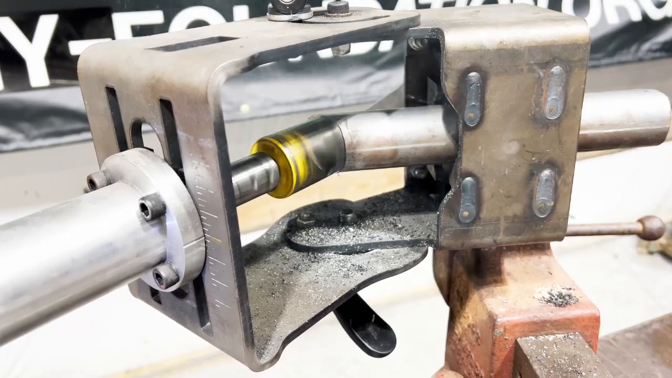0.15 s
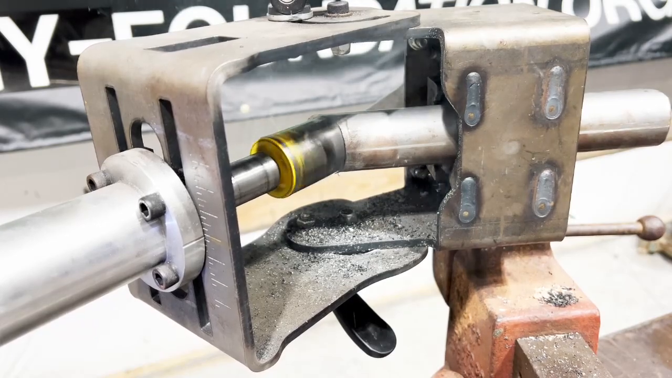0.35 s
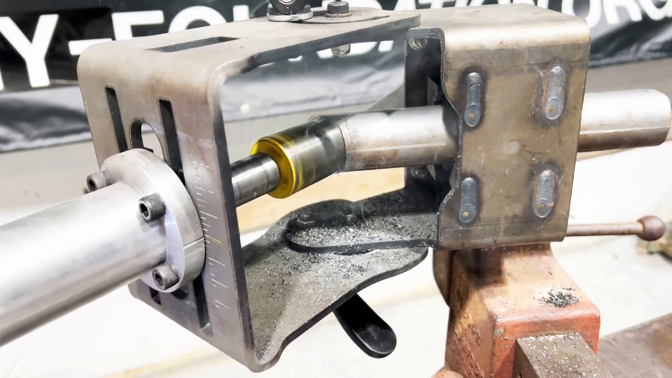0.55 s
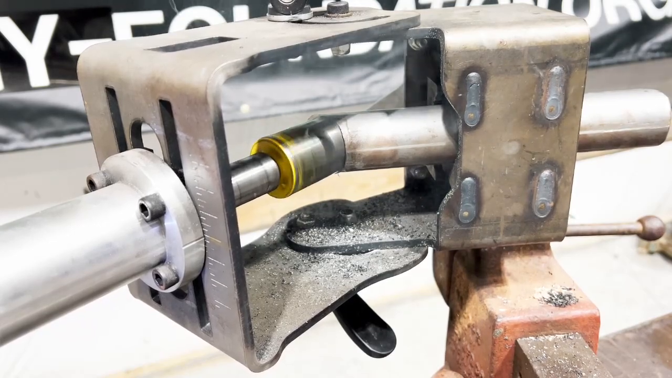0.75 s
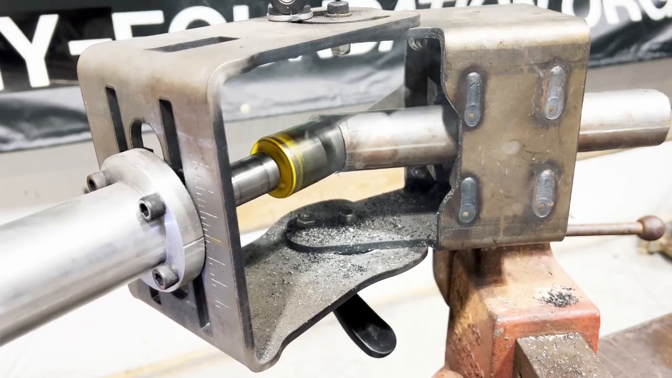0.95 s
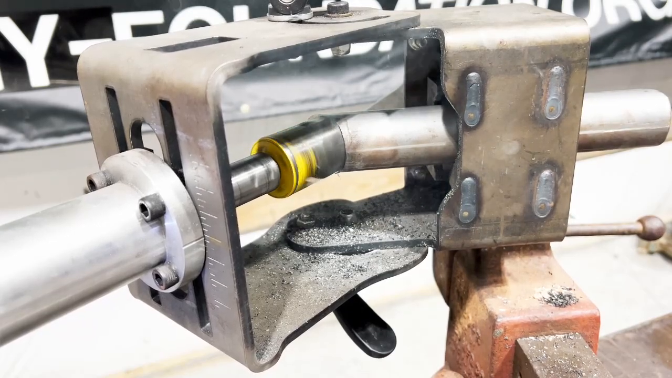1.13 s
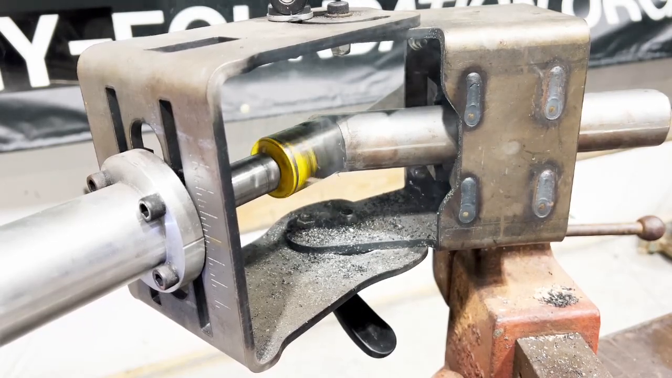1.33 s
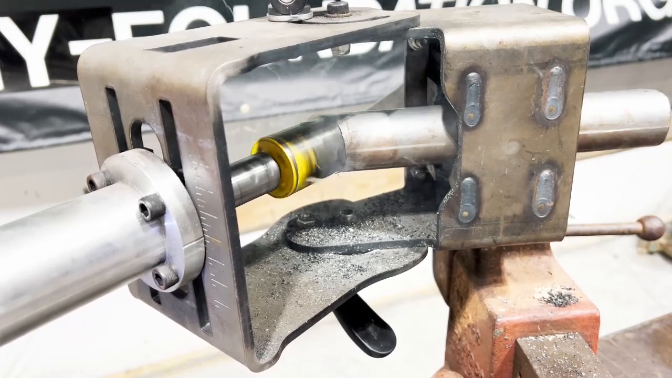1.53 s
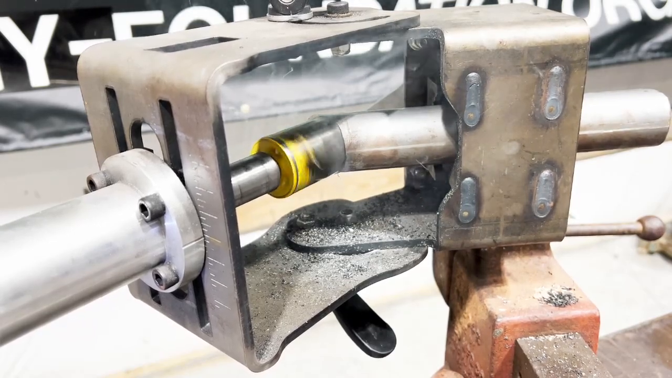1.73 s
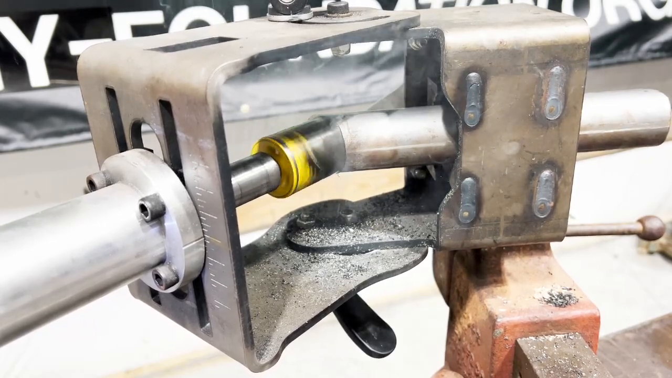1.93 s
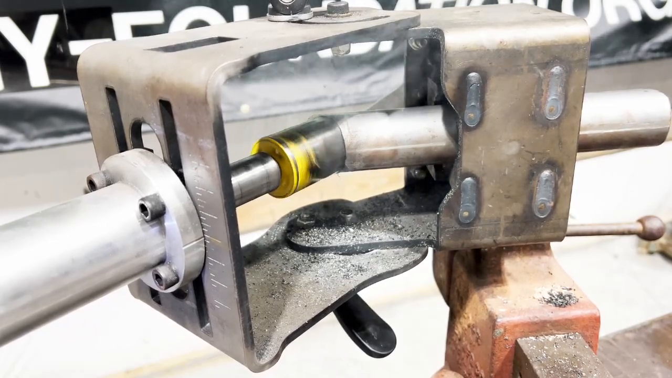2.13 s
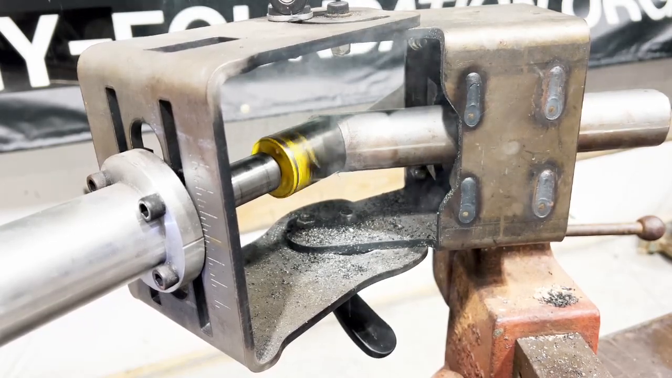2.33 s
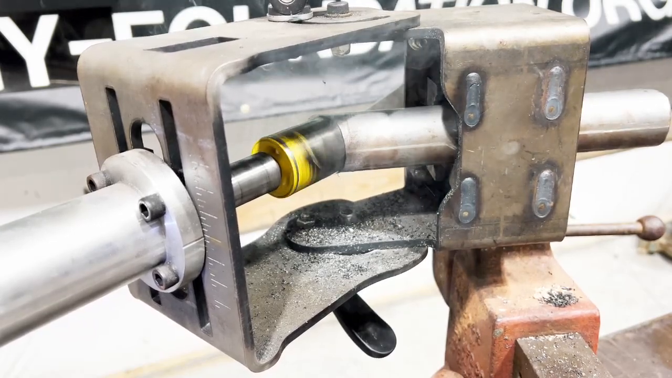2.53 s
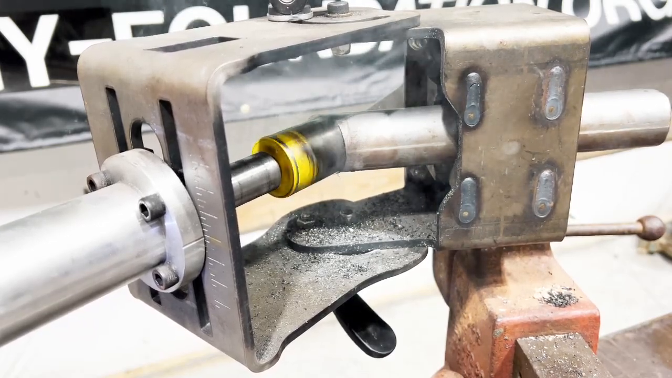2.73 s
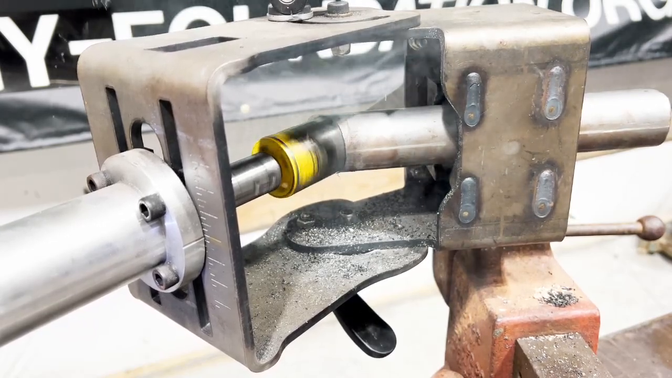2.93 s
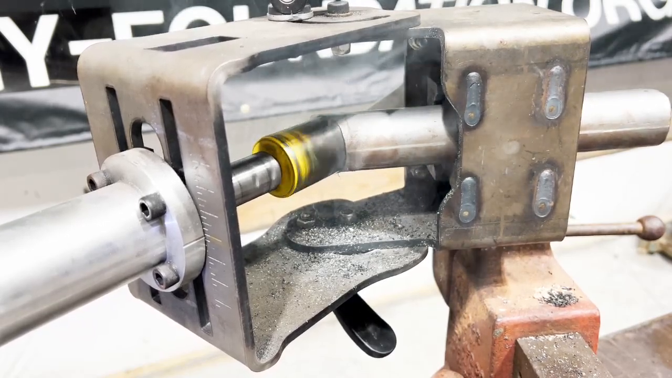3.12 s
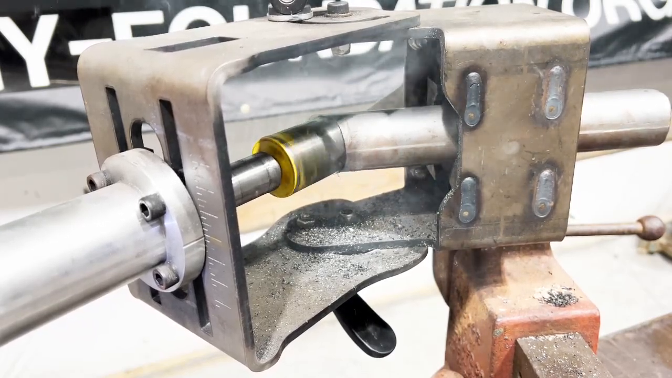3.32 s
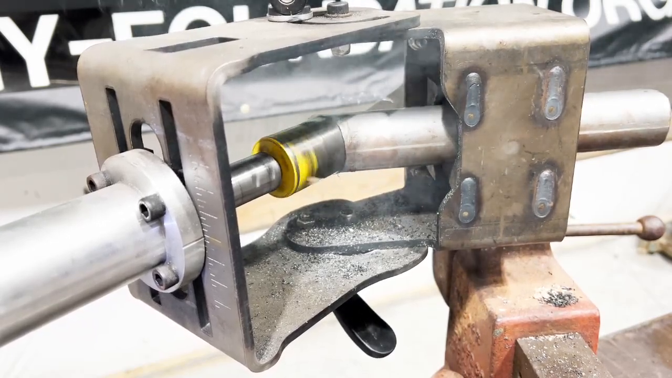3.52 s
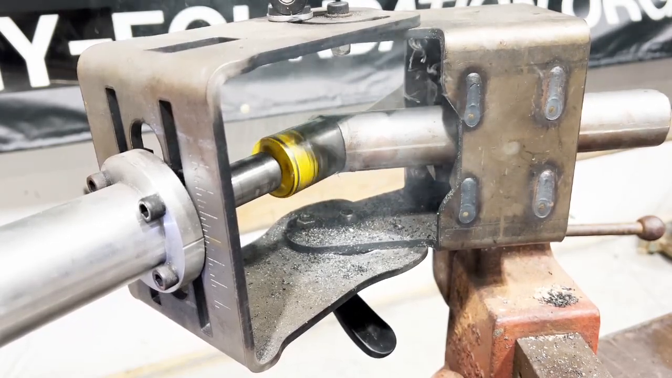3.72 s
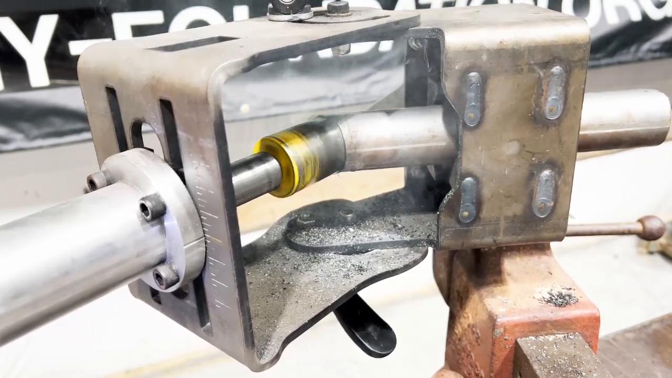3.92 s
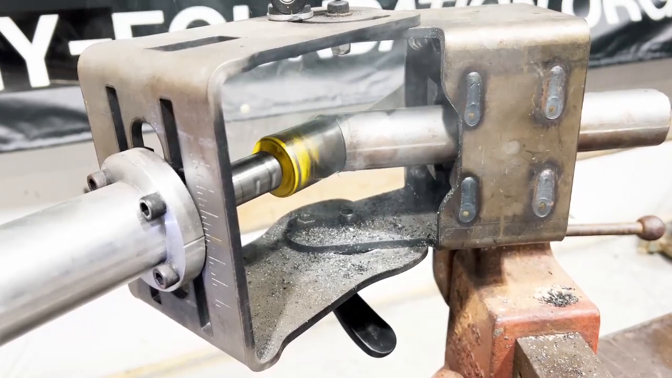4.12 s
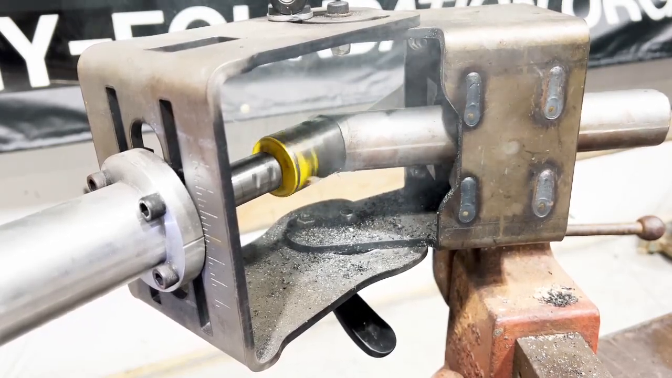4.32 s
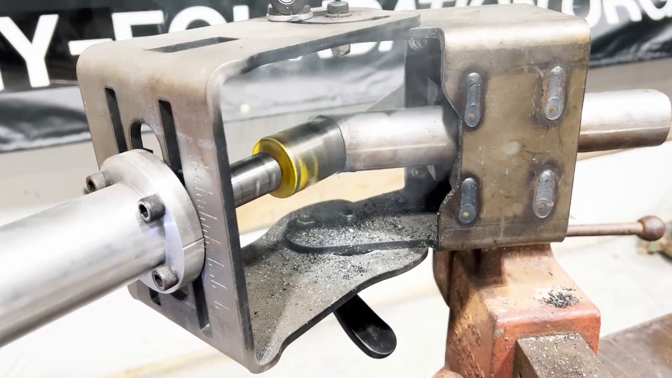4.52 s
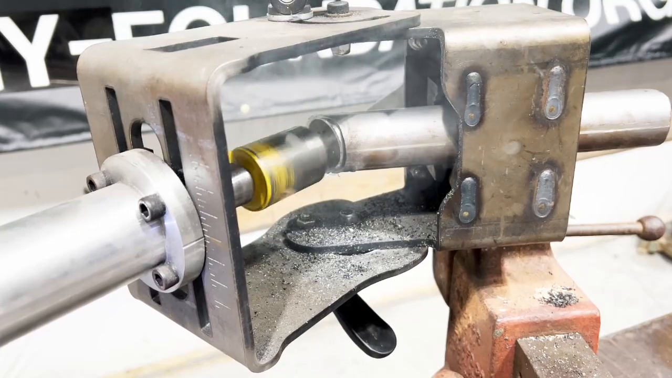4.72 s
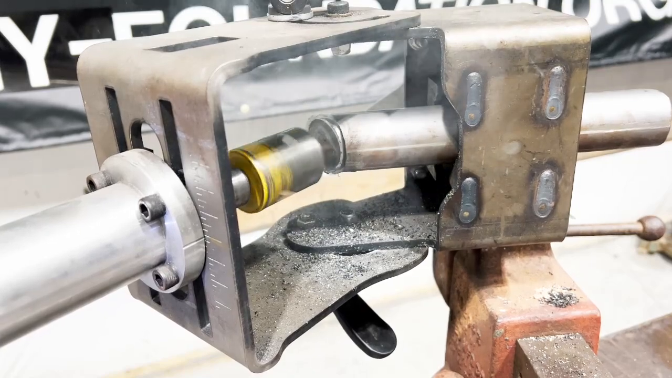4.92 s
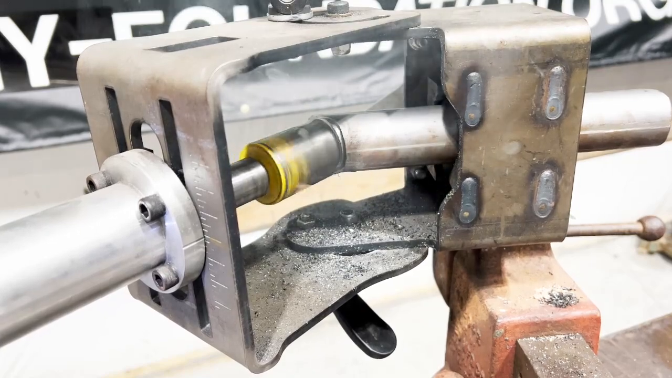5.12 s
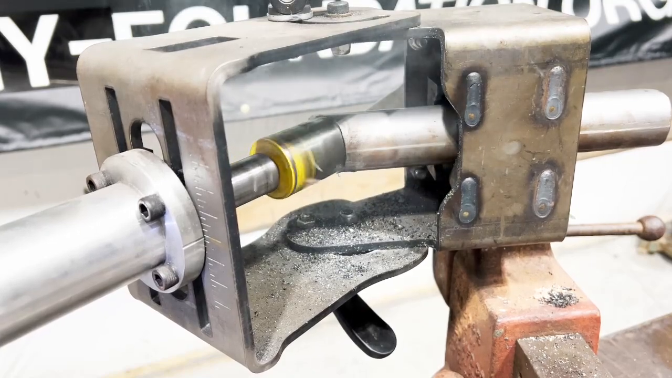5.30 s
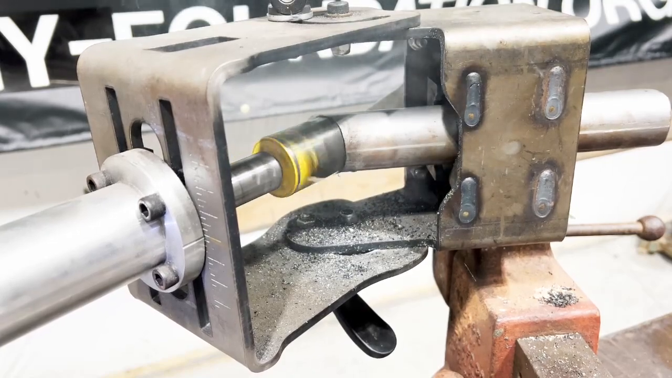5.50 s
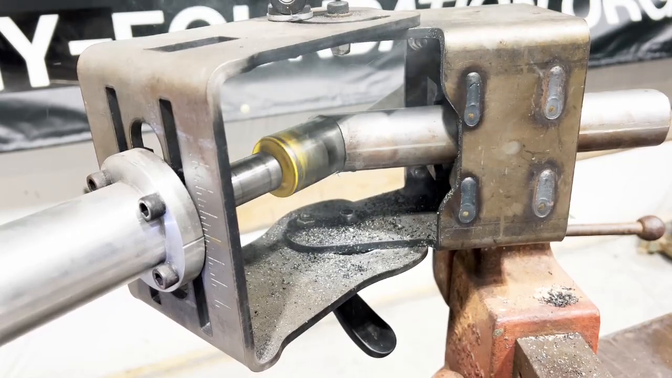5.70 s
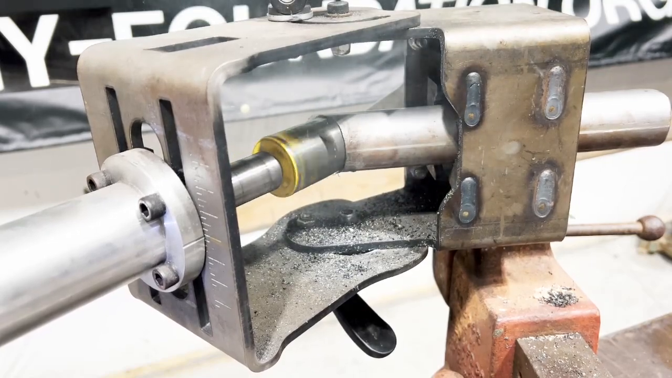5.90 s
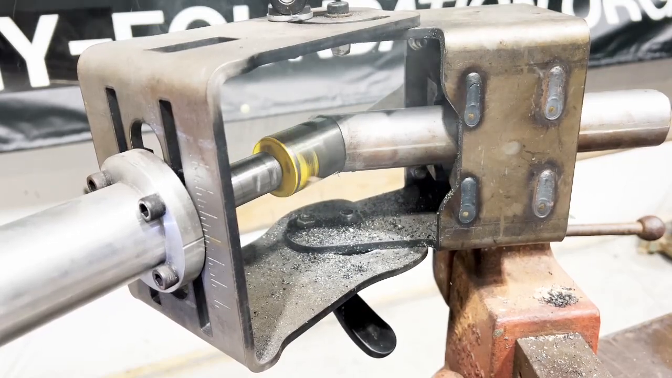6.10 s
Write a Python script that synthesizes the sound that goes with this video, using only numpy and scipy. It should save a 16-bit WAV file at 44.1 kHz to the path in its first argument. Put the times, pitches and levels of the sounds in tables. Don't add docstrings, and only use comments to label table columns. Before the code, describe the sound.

A drill-driven hole saw grinds through a steel tube with rapid rhythmic screeching chatter, backs off to a bare whirr, then bites in again louder.

```python
import sys
import numpy as np
from scipy import signal
from scipy.fft import rfft, irfft, next_fast_len
from scipy.io import wavfile

SR = 44100
rng = np.random.default_rng(int(sys.argv[2]) if len(sys.argv) > 2 else 0)


def store_wav(level_fs):
    pcm = np.round(np.clip(np.atleast_2d(level_fs), -1, 1) * 32767)
    wavfile.write(sys.argv[1], SR, pcm.T.astype(np.int16))


def boost(x):
    u = np.asarray(x, float) / 20
    return 10 ** u


N = 271215

# (frequency [Hz], width [Hz], level [dB])
PLATE_MODES = [(1162, 16, 3), (1522, 13, 11.5), (2350, 250, 2.5), (3380, 910, -0.5)]


def rms_one(x):
    return x / np.sqrt(np.mean(x ** 2) + 1e-20)


def at_hz(points, hz):
    point_hz, db = np.transpose(points)
    return np.interp(np.log(hz + 1), np.log(point_hz), db)


def drift(rate):
    r = np.exp(-2 * np.pi * rate / SR)
    noise = rng.standard_normal(N + 20000)
    return rms_one(signal.lfilter([1], [1, -2 * r, r * r], noise)[20000:])


def filtered(x, order, hz, kind):
    return signal.sosfilt(signal.butter(order, hz, kind, fs=SR, output="sos"), x)


def delayed(x, lag_s):
    return np.interp(np.arange(N) - lag_s * SR, np.arange(N), x)


def modes(x, table, sway_db=0.0):
    out = 0
    sway = boost(sway_db * np.clip(drift(26.8), -3, 1.6))
    for k, (hz, width, db) in enumerate(table):
        r = np.exp(-np.pi * width / SR)
        top = (1 - r * r) / 2 * boost(db) * (-1) ** k
        poles = [1, -2 * r * np.cos(2 * np.pi * hz / SR), r * r]
        drive = x * np.roll(sway, 9973 * k)
        out = out + signal.lfilter([top, 0, -top], poles, drive)
    return out


def coloured(x, spectrum):
    gain = boost(at_hz(spectrum, np.fft.rfftfreq(N, 1 / SR)))
    return rms_one(irfft(rfft(x) * gain, N))


def grains(spread_db):
    return rng.standard_normal(N) * boost(spread_db * np.minimum(rng.exponential(1, N), 4))


def two_sides(x, alike):
    return np.array([x, alike * x + np.sqrt(1 - alike ** 2) * np.roll(x, N // 3)])


def frame(rumble_db, hum_db):
    # (frequency [Hz], width [Hz], level [dB])
    bench_modes = [(212.2, 31.6, -3), (253, 27, 1.5), (323, 134, -3.5)]
    # (frequency [Hz], width [Hz], level [dB])
    bearing_modes = [(96, 44, 2), (122, 54, 1.5)]
    # (time [s], frequency [Hz], width [Hz], level [dB])
    tube_settles = (5.632, 220, 25, -34)

    def shaken(body):
        noise = two_sides(rng.standard_normal(N), alike=0.85)
        return rms_one(modes(modes(noise, body, sway_db=3.5), body))

    rumble = shaken(bench_modes)
    hum = shaken(bearing_modes)
    s, hz, width, db = tube_settles
    click = (np.arange(N) == round(s * SR)) + 1e-18
    thud = modes(click, [(hz, width, db + 46.0)])
    return boost(rumble_db) * rumble + boost(hum_db) * hum + thud


def free_spin(t):
    # (frequency [Hz], width [Hz], level [dB])
    spin_moan = [(361, 57, 0.0)]
    middle_s, width_s, level_db = 5.14, 0.15, -62
    spinning = np.exp(-((t - middle_s) / width_s) ** 4)
    moan = modes(modes(rng.standard_normal(N), spin_moan), spin_moan)
    return boost(level_db) * spinning * rms_one(moan)


def drill(grind_db):
    # (frequency [Hz], level per Hz [dB])
    fan_spectrum = [(450, -19), (800, -2.5), (1530, 2), (2100, -15), (2870, -13.5), (5330, 3.5),
                    (8000, -7.5), (11000, -12.5), (16500, -22)]
    # (frequency [Hz], level [dB])
    gear_tones = [(1044, -62), (1513, -62), (2035, -65), (4748, -64), (5055, -64), (5157, -60), (5539, -62),
                  (6056, -67)]
    whirr = boost(-46) * coloured(rng.standard_normal(N), fan_spectrum)
    free = np.clip((-42 - grind_db) / 10, .15, 1)
    turns = np.cumsum(1 + .002 * drift(5.9)) / SR
    sway = drift(25)
    port_phase = np.array([[0], [.15]])
    whine = 0
    for hz, db in gear_tones:
        level = boost(db - 0.5 + 4.0 * np.roll(sway, hz * 9))
        whine = whine + level * np.sin(2 * np.pi * (hz * turns + rng.random() + port_phase))
    return whirr, boost(1.5) * free * whine


def thumps(push, level_db):
    jolt = np.gradient(push)
    swing = delayed(filtered(jolt, 2, [45, 170], "band"), lag_s=0.013)
    knock = delayed(filtered(jolt, 2, [200, 700], "band"), lag_s=0.00365)
    return boost(level_db) * (rms_one(swing) + 2.0 * rms_one(knock))


def grinding(level_db, seated_db):
    # (frequency [Hz], level per Hz [dB])
    rub_spectrum = [(240, -82), (400, -20.5), (1080, -5), (1810, 5), (2930, -8.5), (3650, -15), (4130, -7),
                    (6490, 0), (7350, -17.5), (9130, -8), (10200, -20), (15300, -24.5), (16500, -52)]
    # (frequency [Hz], width [Hz], level [dB])
    wall_modes = [(1850, 77, -27), (2100, 51, 2), (3930, 38, -0.5)]
    # (frequency [Hz], width [Hz], level [dB])
    bracket_modes = [(617, 84, 3.5), (720, 210, -5)]
    rub = coloured(grains(spread_db=3.5), rub_spectrum)
    low = filtered(rub, 4, 8000, "low")
    high = filtered(rub, 4, 8000, "high")
    patches = boost(3.66 * np.minimum(drift(52), 1.5))
    rub = (two_sides(low, alike=0.077) + high) * patches
    scrape = two_sides(grains(spread_db=7.0), alike=0.46)
    ringing = rms_one(modes(scrape, list(PLATE_MODES) + list(wall_modes), sway_db=4.5))
    shaking = two_sides(rng.standard_normal(N), alike=0.12)
    buzz = rms_one(modes(modes(shaking, bracket_modes, sway_db=6.0), bracket_modes))
    return boost(level_db) * (boost(2.0) * rub + boost(-2.5) * ringing + boost(-12 + seated_db) * buzz)


def contacts():
    # (time [s], length [ms], chatter [Hz], bite [dB])
    entering = [(.0614, 10, 1850, -17.5), (.1317, 13.9, 1826, -15), (.201, 9.5, 1853, -12),
                (.267, 12, 1855, -13.5), (.3327, 12, 1717, -13.5), (.4061, 13.6, 1850, -15.5),
                (.5448, 11.3, 1785, -13), (.6106, 6.9, 1696, -19.5), (.7438, 11.1, 1858, -14.5),
                (.8735, 7.8, 1760, -13.5), (1.0075, 8.5, 1760, -13.5), (1.1399, 7.1, 1910, -19),
                (1.2053, 7.2, 1672, -20), (1.3405, 10.1, 1830, -13), (1.4148, 9.8, 1710, -27.5),
                (1.4816, 9.2, 1673, -28.5), (1.5385, 9.9, 1828, -14), (1.6093, 14.3, 1890, -15.5),
                (1.6787, 13.6, 1835, -17.5), (1.749, 8.8, 1860, -16.5), (1.8119, 11.0, 1820, -17),
                (1.8817, 9.6, 1860, -15), (1.9496, 9.4, 1850, -13.5)]
    # (time [s], length [ms], chatter [Hz], bite [dB])
    cutting = [(2.0803, 11.2, 1845, -14.5), (2.143, 12.1, 1850, -15.5), (2.22, 10.4, 1718, -21.5),
               (2.2783, 11.7, 1850, -15.5), (2.3527, 9, 1725, -22.5), (2.4095, 13.7, 1790, -15),
               (2.4804, 12.5, 1866, -16), (2.5482, 12.7, 1860, -15), (2.6136, 13, 1850, -12.5),
               (2.6829, 11, 1850, -13), (2.7512, 14.5, 1865, -15.5), (2.8266, 12, 1736, -21.5),
               (2.8854, 9.6, 1847, -12.5), (2.9598, 12.4, 1745, -19), (3.0256, 7.8, 1880, -11.5),
               (3.0965, 10.6, 1857, -13.5), (3.1683, 11.6, 1918, -14.5), (3.2431, 11, 1738, -18.5),
               (3.3125, 8.07, 1866, -16), (3.3808, 12.3, 1885, -15.5), (3.4505, 14, 1885, -15),
               (3.5275, 12, 1714, -20.5), (3.5903, 14, 1880, -15), (3.6642, 9.7, 1963, -16),
               (3.732, 12, 1866, -12), (3.807, 12.4, 1916, -15), (3.8787, 13, 1877, -15.5),
               (3.9515, 8.8, 1893, -13)]
    # (time [s], length [ms], chatter [Hz], bite [dB])
    through = [(4.0229, 10, 1902, -14), (4.0922, 7.9, 1908, -11.5), (4.164, 12.7, 1925, -15.5),
               (4.2338, 9.4, 1915, -12.5), (4.3145, 11.8, 2028, -15.5), (4.3905, 8.4, 1960, -13.5),
               (4.4604, 8.8, 1852, -12), (4.5242, 9.06, 1797, -19), (4.5561, 3.4, 1900, -19.5),
               (5.4586, 9, 1695, -17), (5.6312, 14, 1797, -11), (5.6931, 11, 1752, -11.5),
               (5.7589, 10.8, 1866, -17.5), (5.8263, 8.7, 1860, -13.5), (5.8936, 9.3, 1848, -12),
               (5.9634, 9.4, 1840, -12), (6.0313, 7.9, 1850, -9.5), (6.0996, 11, 1825, -14)]
    # (time [s], chatter of a full bite [dB], letting go [Hz], letting go [dB])
    kerf = [
        (0, -29.5, 1738, -29.5),
        (1.0, -31.5, 1652, -25),
        (1.9, -28, 1711, -28.5),
        (2.6, -27.5, 1702, -25),
        (3.5, -27, 1731, -25.5),
        (3.75, -28, 1839, -29),
        (4.5, -27, 1933, -30.5),
        (5.45, -34.5, 1700, -67),
        (5.75, -24.5, 1697, -44),
        (6.1, -22, 1960, -36),
    ]
    # (time [s], chatter [Hz], chatter [dB], screech [dB])
    far_catches = [(0.1035, 1850, -31, -18.5), (.1696, 2050, -32, -20.5), (0.242, 2044, -31, -22),
                   (.3103, 2060, -28, -21), (0.377, 2180, -29.5, -26), (.4495, 2084, -30, -23),
                   (0.6483, 2012, -30.5, -27), (.7169, 2130, -27, -20.5), (.7832, 2100, -30, -34),
                   (.8511, 2100, -32, -31), (1.1766, 2015, -31, -28), (1.313, 2130, -27.5, -23),
                   (1.4436, 2160, -31.5, -34), (1.8533, 2100, -31, -36), (3.478, 2180, -36, -30.5),
                   (3.837, 1850, -30, -27), (3.982, 1737, -33, -27), (4.603, 2100, -52, -27.5),
                   (4.661, 2450, -37, -30), (5.3099, 2540, -24, -27.5), (5.352, 2620, -27, -25.5),
                   (5.442, 1950, -38, -23), (5.4929, 1970, -27.5, -19), (5.5454, 2100, -26, -18.5),
                   (5.6013, 2140, -26, -22), (5.6581, 2090, -24.5, -32), (5.8535, 2210, -31, -33),
                   (5.921, 2140, -27, -53), (5.991, 2400, -26, -47), (6.128, 2230, -32, -44)]
    s, ms, hz, db = np.transpose(list(entering) + list(cutting) + list(through))
    at, *columns = np.transpose(kerf)
    chatter_db, go_hz, go_db = [np.interp(s, at, c) for c in columns]
    short_db = db + 15.5
    full = hz > 1750
    luck = rng.standard_normal((8, len(s)))
    turn_db, loose_db, catch_ms = 1.5, 3.5, 6.84

    first = chatter_db + 0.71 * short_db + 4.5 * ~full + turn_db * luck[0]
    second = chatter_db + 2 + 0.78 * short_db - 0.5 * ~full + turn_db * luck[1]
    biting = [s, ms, hz, first, second, db]
    going = [s + .007 + .27 * (ms / 1000), catch_ms + 0 * s, go_hz * (1 + .012 * luck[2]),
             go_db + turn_db * luck[3], go_db - 8 + loose_db * luck[4], go_db - 2.5 + loose_db * luck[5]]
    grab = [s - .28 * (ms / 1000), 6.0 + 0 * s, hz + .7 * (1865 - hz),
            first - 9.0, second - 2.5 + turn_db * luck[6], db - 12.0 + turn_db * luck[7]]
    catches = [(t, catch_ms, f, a, b - 8.5, b) for t, f, a, b in far_catches]
    return (list(np.transpose(biting)) + list(np.transpose(going)[full])
            + list(np.transpose(grab)[full]) + catches)


def bites():
    # (frequency [Hz], width [Hz], level [dB])
    cup_modes = [(4350, 430, -9), (5234, 100, 4), (5830, 300, -3), (6620, 426, 1.5), (6816, 450, 0.5),
                 (7970, 1460, -11.5), (8695, 400, -8.5), (9284, 105, -0.5), (9950, 213, -9),
                 (11000, 430, -16.5), (11960, 390, -16.5), (13850, 6000, -17.5), (14500, 280, -29.5)]
    tone, third, slips, push = np.zeros((4, N))
    wobble = drift(131)
    flutter = boost(2.74 * drift(530))
    rows = contacts()
    span = np.arange(-1024, 2048)
    t = span / SR
    for (s, ms, hz, first_db, second_db, screech_db), starts in zip(rows, rng.random((len(rows), 3))):
        at = np.clip(round(s * SR) + span, 0, N - 1)
        edge = np.abs(t / (ms * 0.00057))
        shape = np.exp(-np.where(t < 0, edge ** 6.1, edge))
        turns = np.cumsum(hz * (1 + 0.017 * wobble[at] - 3.007 * t)) / SR
        waves = np.sqrt(2) * np.sin(2 * np.pi * (turns * [[1], [2], [3]] + starts[:, None]))
        first = boost(first_db - 0.5) * waves[0] * np.sqrt(flutter[-at])
        second = boost(second_db - 2.5) * waves[1] * flutter[at]
        tone[at] += shape * (first + second)
        third[at] += shape * boost(screech_db - 12.0) * waves[2]
        slips[at] += shape * boost(screech_db) * (0.11 + np.maximum(waves[0], 0) ** 2)
        push[at] += shape * boost(screech_db + 16.5)
    spray = grains(spread_db=2.5)
    screech = modes(two_sides(spray, alike=0.12) * slips, cup_modes[:6], sway_db=-1.5)
    screech = screech + modes(spray * slips, cup_modes[6:], sway_db=3.5)
    screech = screech / np.std(modes(spray, cup_modes))
    plates = modes(spray * push, PLATE_MODES, sway_db=3.0)
    return tone + third * flutter + boost(-6.0) * screech + boost(-25.5) * plates, push


def ports(x):
    # (frequency [Hz], left minus right [dB])
    port_shading = [(100, -3), (250, 0.5), (600, 2.5), (1900, -2), (3000, 2), (4400, 5.5), (5700, 8.5),
                    (6400, 4.5), (7300, 5.5), (9500, -0.5), (16000, 0)]
    # (frequency [Hz], scattered minus direct [dB])
    scatter_share = [(100, -16), (600, -4), (1900, -7), (3000, -4), (7300, -5), (9000, -17), (16000, -17)]
    size = next_fast_len(N + 8192)
    hz = np.fft.rfftfreq(size, 1 / SR)
    t = np.arange(8192) / SR
    decay = boost(-60 * t / 0.062) * (1 - np.exp(-t / 0.00011))
    scatter = rng.standard_normal((2, 8192)) * decay
    scatter = rfft(scatter / np.sqrt(np.sum(scatter[0] ** 2)), size)
    lead, lag = 2 * np.pi * hz * .000263 - 1.0, -2 * np.pi * hz * .00053
    turn = np.where(hz > 4200, lead, lag)
    wet = boost(at_hz(scatter_share, hz))
    heard = (np.exp(1j * turn * [[0], [1]]) + wet * scatter) / np.sqrt(1 + wet ** 2)
    shade = boost(at_hz(port_shading, hz) / 2 * [[1], [-1]])
    return irfft(rfft(x, size) * heard * shade, size)[:, :N]


def scene():
    # (time [s], level [dB])
    feed = [(0, -38.5), (.15, -39.5), (.3, -39), (1.22, -40.5), (2.0, -40), (4.45, -39), (4.67, -42),
            (4.72, -53), (4.95, -54.5), (5.26, -52.5), (5.31, -40.5), (5.62, -37.5), (5.9, -38),
            (6.15, -35.5)]
    t = np.arange(N) / SR
    s, db = np.transpose(feed)
    grind_db = np.interp(t, s, db)
    cutting_db = -39
    touch_s, press_s = s[9], s[10]

    shove = np.exp(-((t - 5.43) / 0.2) ** 2)
    shove = shove * np.clip((t - touch_s) / (press_s - touch_s), 0, 1)
    late_db = np.interp(t - 0.23 * (t < touch_s), s, db)
    settling_db = np.minimum(late_db - cutting_db, 0) * (1 - shove)
    rumble_db = -56.5 + 1.2 * settling_db + 6 * shove
    hum_db = -65 + 0.38 * (grind_db - cutting_db) + 11 * shove

    lurch = np.exp(-((t - 0.25) / 0.031) ** 2)
    loosening_db = 21.5 * np.maximum(t - 5.46, 0)
    thump_db = -75 + loosening_db + 9 * lurch
    seated_db = -6 * np.clip(np.minimum(t - 2.0, 5.85 - t) / 0.18, 0, 1)

    chatter, push = bites()
    whirr, whine = drill(grind_db)
    steel = chatter + grinding(grind_db, seated_db) + frame(rumble_db, hum_db) + thumps(push, thump_db)
    return ports(steel + whirr + free_spin(t)) + whine


def low_pass(x):
    return signal.sosfilt(signal.butter(12, 17000, fs=SR, output="sos"), x)


def record(dry):
    rounded = 1.262 * np.tanh(dry / 1.312)
    mix = filtered(rounded, 2, 48, "high")
    mix = signal.sosfilt(signal.cheby2(10, 28, 16100, fs=SR, output="sos"), mix)
    return low_pass(mix)


dry = scene()
out = record(dry)
store_wav(out)
```